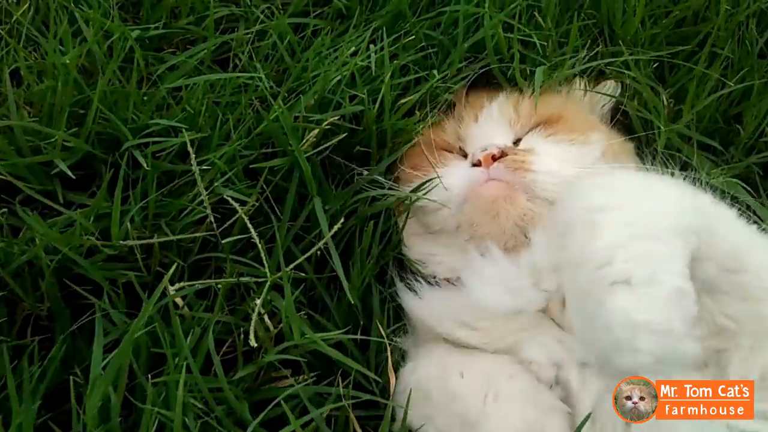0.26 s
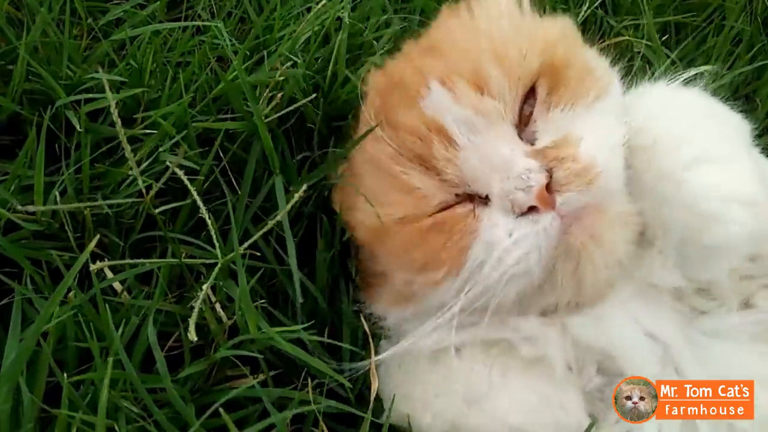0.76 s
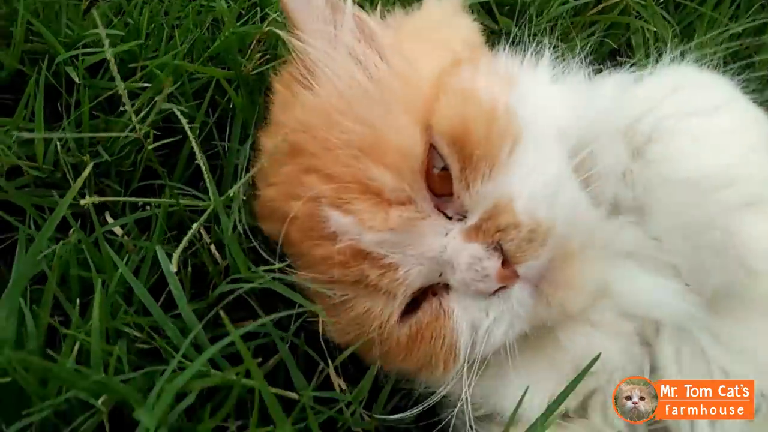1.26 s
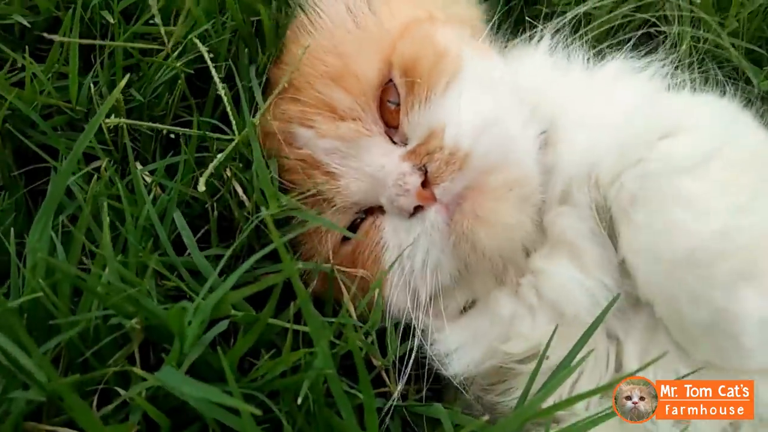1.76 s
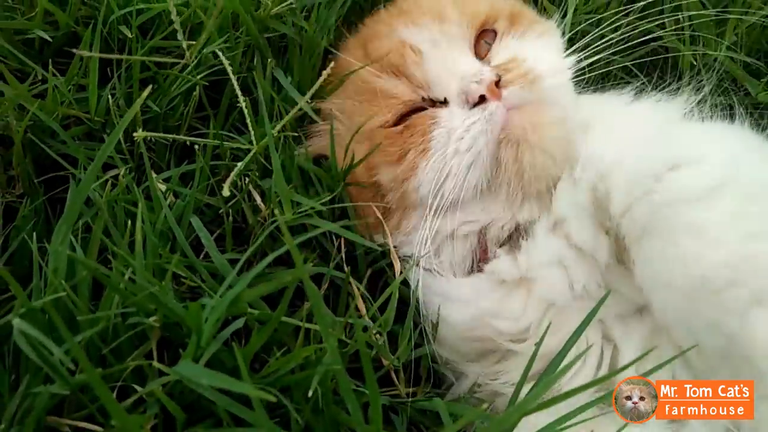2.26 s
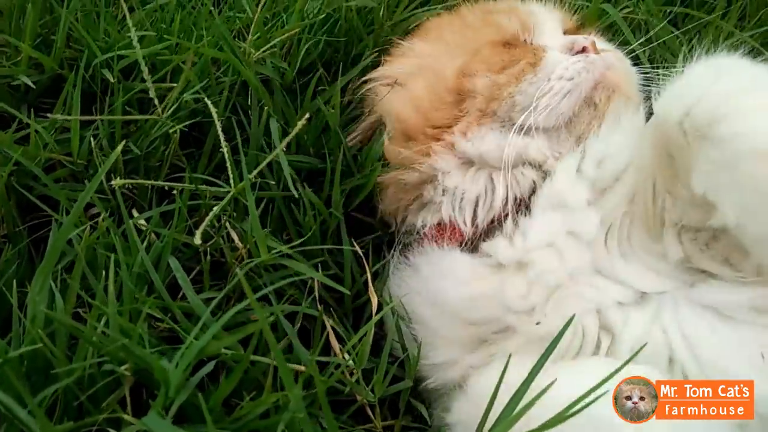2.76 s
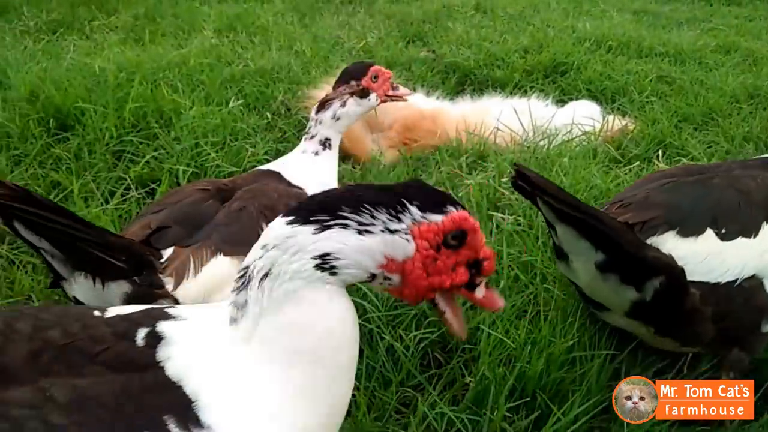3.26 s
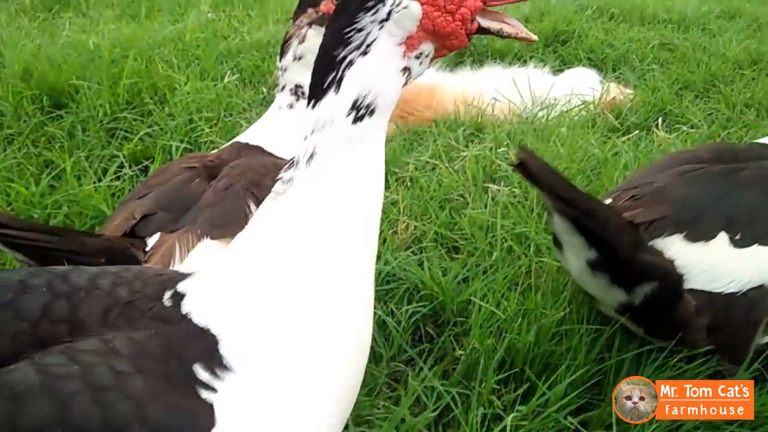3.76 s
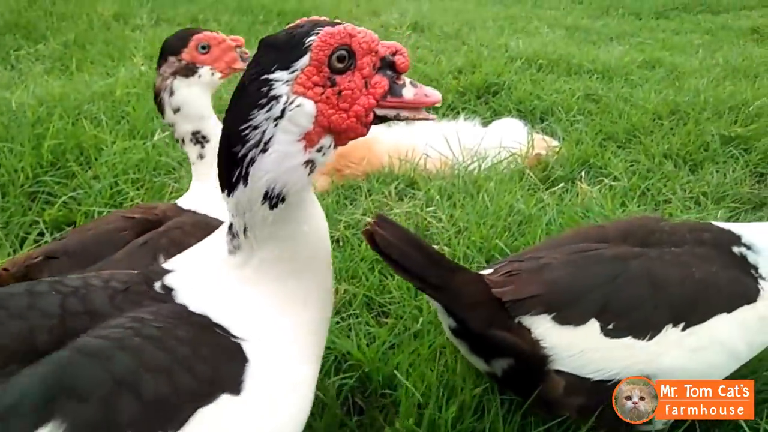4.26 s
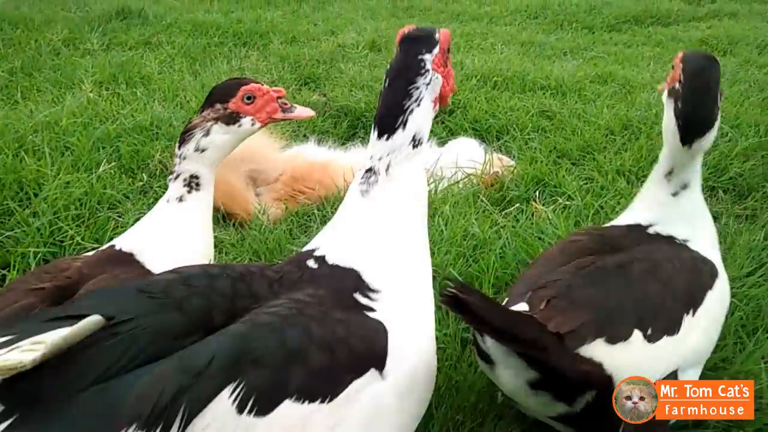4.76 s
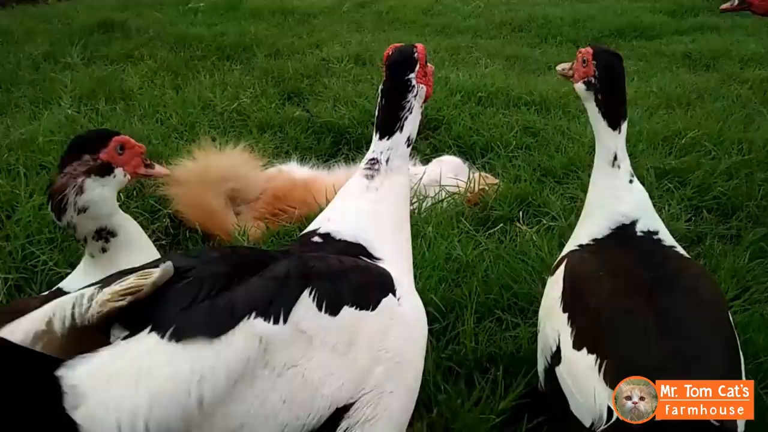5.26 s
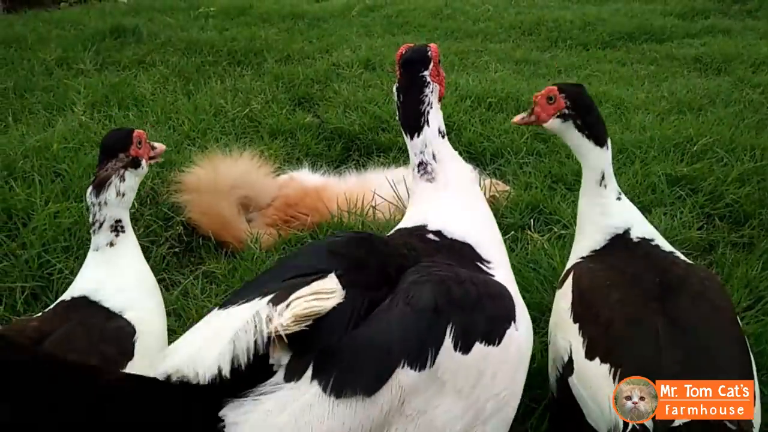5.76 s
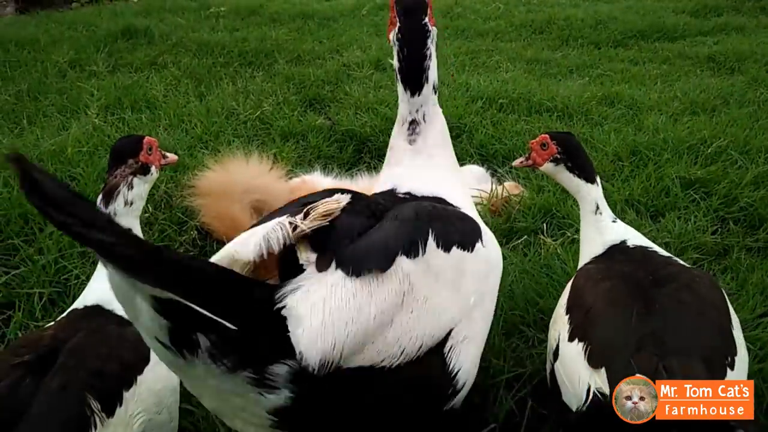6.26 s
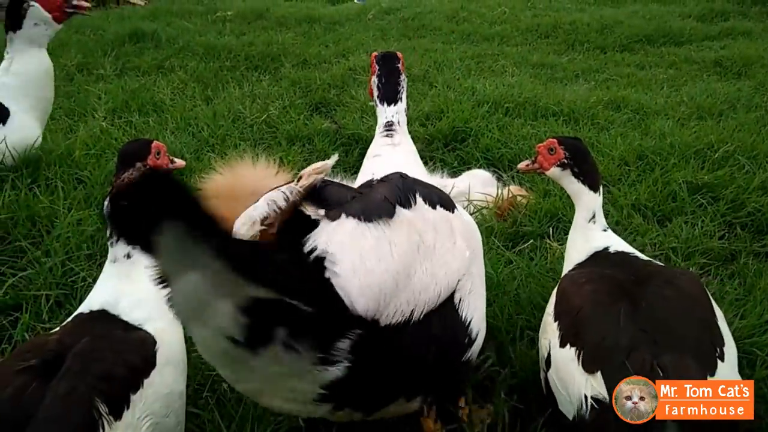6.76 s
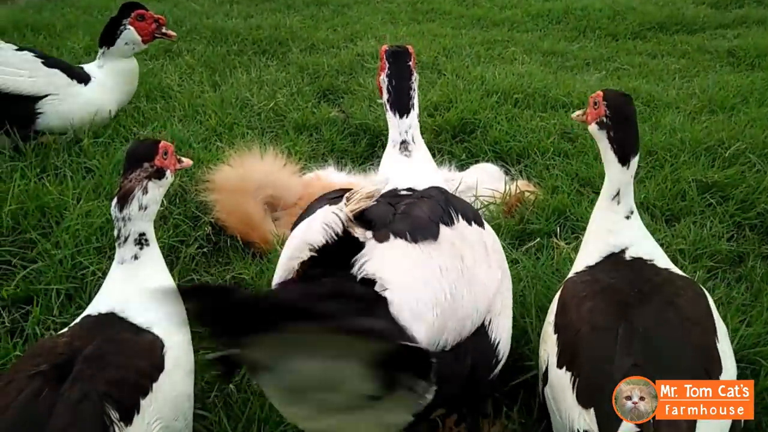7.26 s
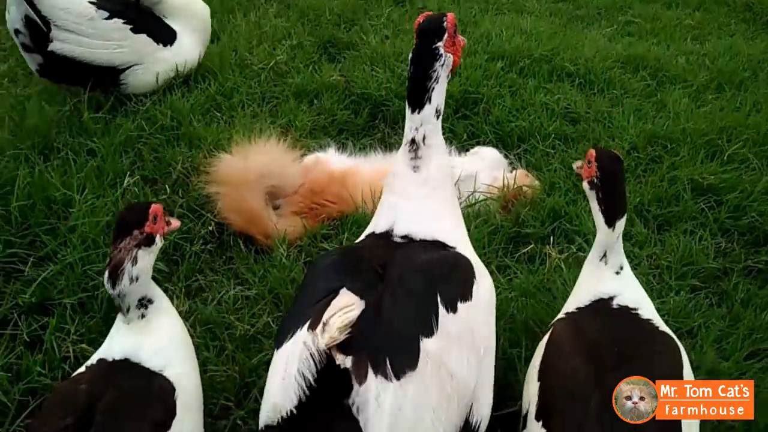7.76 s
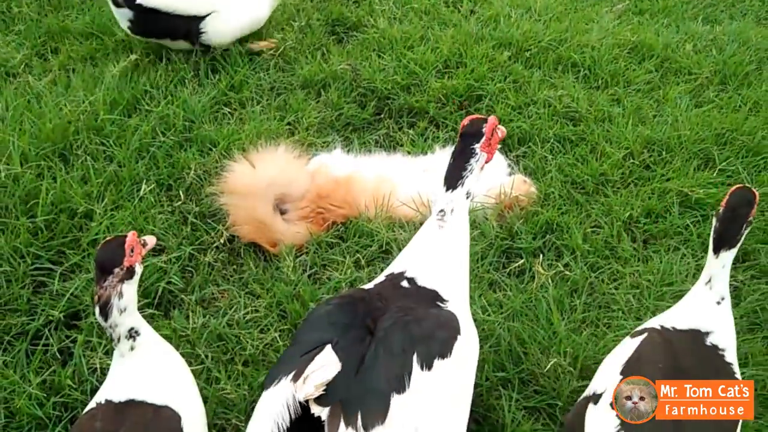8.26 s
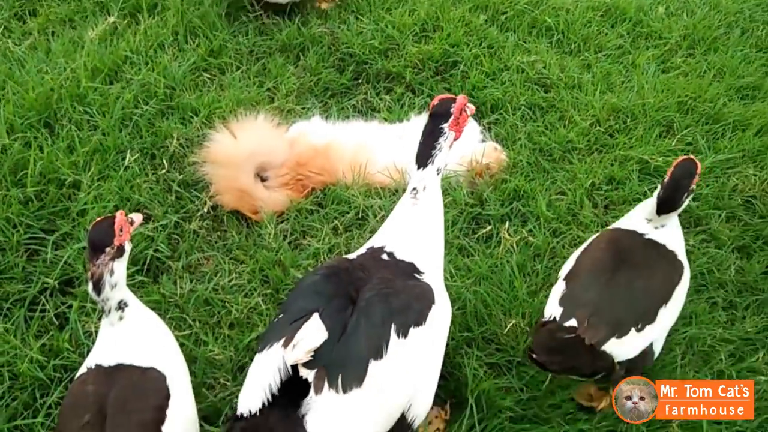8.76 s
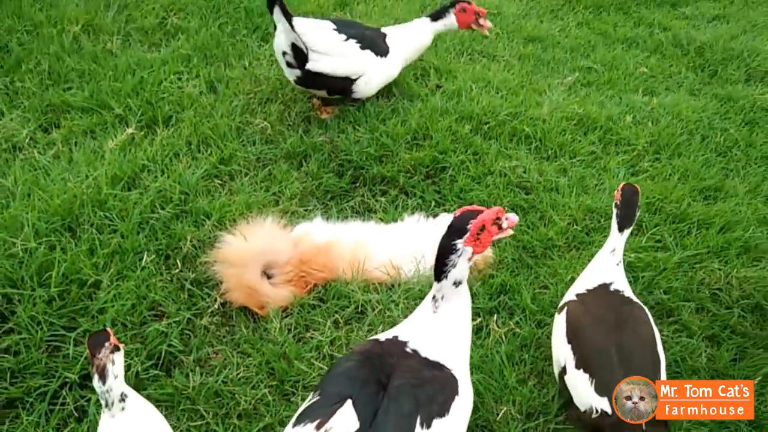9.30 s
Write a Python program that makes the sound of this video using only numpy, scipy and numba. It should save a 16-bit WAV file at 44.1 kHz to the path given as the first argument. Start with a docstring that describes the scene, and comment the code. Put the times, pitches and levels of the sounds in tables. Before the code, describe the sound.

A group of ducks calls softly on a lawn, with light wind rumbling on the microphone. In the first second and a half there are faint breathy huffs, dull scuffs in the grass and a quick cluster of high ticks at about 0.5 seconds. A distant cow grunts hoarsely from 1.3 seconds, then holds one steady low until 2.8. Right after, the ducks break into clear pips and wavering, half-whistled trills. From about 3 seconds they pant short, hoarse huffs, roughly three a second, over a high hiss that swells and sinks. The huffing is strongest from 4 to 7 seconds, with trills, pips and an occasional thin note woven through. Dull bumps hit the microphone near 0.8, 3.6 and 6.2 seconds. The calls dip around 7 seconds, pick up again near 8.4, then thin out with a faint grass rustle before ending at 9.5.

```python
"""Ducks crowding on a lawn

Drakes pant hoarse huffs, breath rushing through windpipe and beak, while a high hiss floor swells and
sinks with the panting. Hens trill a wavering half-whistle, hold thin notes and pip. Early on a far cow
grunts and lows. Grass scuffs and rustles, a few high ticks sound, and wind bumps the microphone."""
import sys
import numpy as np
from scipy import signal
from scipy.fft import rfft, irfft, next_fast_len
from scipy.io import wavfile
from scipy.ndimage import uniform_filter1d
from numba import njit

SR = 44100
rng = np.random.default_rng(int(sys.argv[2]) if len(sys.argv) > 2 else 0)


def transcribe(u):
    """Save the signal u as a 16-bit wav file named by the first command-line argument.

    u: samples, shape (n,) or (channels, n), limited to [-1, 1]; the rate is SR.
    q: integer samples, one column per channel.
    """
    v = np.clip(np.atleast_2d(u).T, -1, 1)
    q = np.round(v * 32767).astype(np.int16)
    wavfile.write(sys.argv[1], SR, q)


N = 420273
CUTOFF_HZ = 14340

# The drakes' huffs: middle_s, length_s, pipe_hz, pipe_db, hiss_db, top_lift_db, lift_near_6khz_db,
# sharp_hz (hiss resonance), then centre_hz, level_db for each of three beak cavities
DRAKE_HUFFS = [(0.009, 0.022, 1450, -61.5, -65, -8, 6.5, 7930, 2830, -66, 3500, -62, 4700, -72),
               (0.844, 0.076, 1440, -58.5, -60.5, -9, 5, 7800, 2730, -69.5, 3730, -71, 4240, -69.5),
               (1.482, 0.072, 1306, -64, -63.5, -6, 13.5, 10900, 2730, -72, 3600, -70.5, 4340, -66.5),
               (1.969, 0.091, 1470, -59, -63.5, -3, 11.5, 10600, 3100, -71, 3840, -73, 4430, -70.5),
               (2.598, 0.11, 1510, -59, -64, -1, 14.5, 10700, 2320, -66.5, 3760, -68.5, 4470, -67.5),
               (2.856, 0.03, 1340, -42, -59.5, -13, -6, 9300, 2900, -66.5, 4270, -73, 4500, -71),
               (2.896, 0.014, 1350, -45, -58, -12, -11, 9300, 3020, -67, 4070, -60, 4350, -63),
               (3.042, 0.072, 1240, -45.5, -87, -4, 15, 9400, 2480, -83, 4060, -77, 4840, -75),
               (3.103, 0.035, 1190, -47, -74.5, -18, 9, 9900, 3040, -64, 3480, -91, 4420, -64.5),
               (3.303, 0.037, 1430, -53, -61.5, 0, -6, 10600, 2880, -62.5, 3530, -71, 4460, -75),
               (3.377, 0.068, 1400, -55.5, -56.5, -6, 10, 9640, 2860, -60, 3930, -65.5, 4390, -75),
               (3.476, 0.12, 1355, -56, -68.5, -4, 13, 8850, 2850, -72.5, 3870, -78, 4250, -85),
               (3.687, 0.1, 1270, -80, -53, 9.5, 4.5, 9060, 2430, -61.5, 3620, -68, 5060, -64),
               (3.845, 0.04, 1330, -68, -78, -6, 1, 9600, 2600, -88, 3500, -94, 4500, -92),
               (3.965, 0.11, 1280, -66.5, -48.5, -2, -5, 10000, 2500, -61.5, 3800, -63.5, 4590, -84),
               (4.18, 0.058, 1370, -43.5, -61, -4, 11, 9200, 2770, -49.5, 3870, -45.5, 4580, -58),
               (4.28, 0.077, 1080, -72, -44, -5, -7, 9200, 2440, -59, 3770, -59.5, 4740, -62),
               (4.576, 0.078, 1360, -43.5, -65, -6, 0, 11500, 2700, -57.5, 3940, -59.5, 4440, -61),
               (4.7, 0.13, 1360, -77, -63.5, -9, -18, 9400, 2510, -64, 3890, -69.5, 4700, -66.0),
               (5.04, 0.077, 1365, -48, -57.5, -1.5, 4.5, 9300, 2830, -56.5, 3880, -56, 4160, -60.5),
               (5.317, 0.065, 1294, -46, -57, 1.5, 2, 10000, 3100, -58.5, 3500, -66, 4300, -61.5),
               (5.504, 0.057, 1350, -47.5, -82, -16, -9, 9240, 2819, -62, 3160, -60.5, 4300, -91),
               (5.618, 0.08, 1290, -74, -55.5, -13, -10, 9080, 2760, -70, 3670, -70, 4500, -64.5),
               (5.881, 0.067, 1390, -45.5, -57.5, -14, -7, 9990, 3130, -54.5, 3770, -56, 4200, -59),
               (6.12, 0.055, 1410, -46.5, -67, -13, -11, 9450, 2880, -58, 3383, -59, 4400, -84),
               (6.377, 0.058, 1420, -45, -63.5, -12, -1, 9800, 2760, -58.5, 3218, -58.5, 4380, -91),
               (6.572, 0.049, 1420, -51.5, -61, -7, 0, 9300, 2800, -58.5, 3620, -58.5, 5440, -69),
               (6.693, 0.047, 1410, -55, -60.5, -10, -1, 8600, 3140, -88, 3850, -56, 4340, -62),
               (6.93, 0.07, 1420, -55.5, -68.5, -10.5, -8, 8700, 2800, -60.5, 3623, -69, 4270, -68),
               (7.232, 0.067, 1180, -61.5, -79, 2, 14, 8750, 2810, -94, 3720, -65, 4240, -72),
               (7.319, 0.09, 1425, -49.5, -82, -5, 1, 8860, 2730, -58.5, 3290, -59.5, 3970, -65),
               (7.601, 0.15, 1216, -57.5, -86, -7, 2.5, 8600, 2686, -81.5, 3290, -85, 4560, -99),
               (7.94, 0.058, 1390, -49, -62.5, -8.5, 6, 8940, 2640, -58, 3410, -60, 4700, -71),
               (8.276, 0.057, 1390, -61, -77, -3, -6, 9350, 3040, -61, 3450, -51.5, 4300, -61),
               (8.409, 0.081, 1470, -75, -81, -4, 8, 9000, 2710, -71, 3470, -71, 4340, -82),
               (8.488, 0.057, 1330, -47, -64, 1, 6, 9850, 2690, -54, 3490, -48.5, 4380, -53),
               (8.696, 0.05, 1370, -51, -70, -1, 12.5, 10800, 2730, -54.5, 3360, -55.5, 4440, -70),
               (9.138, 0.35, 1560, -85, -67, -2.5, 13.5, 9400, 2560, -81, 3230, -81, 4536, -87),
               (9.434, 0.056, 1405, -52, -70, -9, 0, 9200, 2840, -55, 3620, -59, 4900, -74)]


def amp(db):
    """Gain of a level in dB."""
    return 10 ** (np.asarray(db) / 20)


def rms_one(x):
    """Scale to rms 1."""
    return x / np.sqrt(np.mean(x ** 2) + 1e-20)


def in_time(rows, fade_s=0.0091):
    """A curve for each column after the time, then a gate that fades shut outside the rows."""
    s, *columns = np.transpose(rows)
    t = np.arange(N) / SR
    gate = np.clip(np.minimum(t - s[0], s[-1] - t) / fade_s + 1, 0, 1)
    return [np.interp(t, s, column) for column in columns] + [gate]


def glide(start_s, end_s, first_hz, last_hz):
    """A frequency curve that slides through each event and on to the next."""
    return np.interp(np.arange(N) / SR, np.ravel([start_s, end_s], "F"), np.ravel([first_hz, last_hz], "F"))


def swells(start_s, hold_s, level_db, rise_db_per_s, fall_db_per_s):
    """Envelope of events that rise, hold and fall away; the loudest one rules."""
    t, out = np.arange(0, N, 32) / SR, -200
    for s, held, db in np.broadcast(start_s, hold_s, level_db):
        attack_db = rise_db_per_s * np.maximum(s - t, 0)
        release_db = fall_db_per_s * np.maximum(t - s - held, 0)
        out = np.maximum(out, db - attack_db - release_db)
    return amp(np.interp(np.arange(N) / SR, t, uniform_filter1d(out, size=9)))


def drift(rate_hz):
    """Smooth random modulation with rms 1."""
    r = np.exp(-40 * np.pi * rate_hz / SR)
    slow = signal.lfilter([1], [1, -2 * r, r * r], rng.standard_normal(N // 20 + 2002))[2000:]
    return np.interp(np.arange(N) / 20, np.arange(len(slow)), rms_one(slow))


@njit
def resonate(x, hz, width_hz, sr):
    """A resonance whose centre may move."""
    out, r = np.zeros(len(x)), np.exp(-np.pi * width_hz / sr)
    for i in range(2, len(x)):
        drive = (1 - r * r) / 2 * (x[i] - x[i - 2])
        out[i] = drive + 2 * r * np.cos(2 * np.pi * hz[i] / sr) * out[i - 1] - r * r * out[i - 2]
    return out


def hollow(x, hz, width_hz):
    """The same resonance twice, for steep flanks."""
    hz = hz + np.zeros(len(x))
    return resonate(resonate(x, hz, width_hz, SR), hz, width_hz, SR)


def noise_band(hz, width_hz, samples=N):
    """Noise through one resonance; rms 1."""
    return rms_one(hollow(rng.standard_normal(samples), hz, float(width_hz)))


def cavities(modes):
    """Turbulent air through parallel resonances (centre_hz, width_hz, level_db); rms 1."""
    air = rng.standard_normal(N)
    return rms_one(sum((-1) ** k * amp(db) * rms_one(hollow(air, hz, width))
                       for k, (hz, width, db) in enumerate(modes)))


def coloured(spectrum):
    """Noise shaped by an EQ curve (frequency_hz, level_db); rms 1."""
    size = next_fast_len(N)
    hz = np.fft.rfftfreq(size, 1 / SR)[1:]
    point_hz, point_db = np.transpose(spectrum)
    gain = amp(np.interp(np.log(hz), np.log(point_hz), point_db, left=-80, right=-80))
    return rms_one(irfft(rfft(rng.standard_normal(size)) * np.append(0, gain), size)[:N])


def tones(hz, partials):
    """Sines at multiples of a pitch (multiple, rms_db)."""
    phase = 2 * np.pi * np.cumsum(hz) / SR
    return sum(amp(db) * np.sqrt(2) * np.sin(k * phase + rng.uniform(0, 2 * np.pi)) for k, db in partials)


def still_air():
    """A faint, steady bed of outdoor air."""
    # Colour of the air: frequency_hz, relative_db
    spectrum = [(120, -35), (200, -20.5), (369, -5), (957, 1.5), (1150, -3.5), (1530, -4.5), (2350, -8),
                (4990, -18.5), (6000, -20.5), (7800, -28), (13200, -120)]
    return amp(-78) * coloured(spectrum)


def wind():
    """Wind rumbles on the microphone, with gusts riding on a low breeze."""
    # Strength of the breeze: time_s, level_db
    breeze = [(0, -79), (1.2, -78.5), (1.6, -72), (2.4, -79), (3.0, -72), (3.6, -78), (5.5, -78),
              (6.6, -81), (8.4, -82), (9.53, -86)]
    # Gusts: peak_s, level_db
    gusts = [(.32, -79), (.9, -74), (1.11, -73.5), (2.65, -81), (2.81, -65), (3.29, -62.5), (3.66, -61.5),
             (3.9, -69), (4.17, -63.5), (4.51, -63), (4.99, -70), (5.33, -67.5), (5.57, -65), (5.89, -64),
             (6.18, -58), (6.48, -75)]
    # Colour of the rumble: frequency_hz, relative_db
    spectrum = [(22, -22), (38, -4), (54, 8), (67, 2.5), (113, -2.5), (150, 3), (227, -13), (300, -5),
                (390, -42), (660, -120)]
    s, db = np.transpose(gusts)
    gusting = swells(s, 0, db, rise_db_per_s=400, fall_db_per_s=195)
    return np.hypot(amp(in_time(breeze)[0]), gusting) * amp(2.36 * drift(8.2)) * coloured(spectrum)


def microphone_bumps():
    """Padded knocks on the microphone ring low, sag in pitch and are faded out within 1/8 s."""
    # Knocks: start_s, level_db, settled_pitch_hz, t60_s (before the fade)
    knocks = [(0.804, -51.5, 60, 0.91), (3.642, -43, 66.5, 0.075), (6.172, -46, 75, 0.095)]
    out, t = np.zeros(N), np.arange(SR // 8) / SR
    attack = 1 - np.exp(-t / 0.001)
    fade = np.hanning(2 * len(t))[len(t):]
    for s, db, hz, t60 in knocks:
        cycles = hz * (t + 0.0041 * (1 - np.exp(-t / 0.0032)))
        out[round(s * SR):][:len(t)] -= attack * np.sin(2 * np.pi * cycles) * amp(db - 60 * t / t60) * fade
    return out


def ticks():
    """Sharp ticks ring for an instant near 9 kHz."""
    # Ticks: start_s, peak_db
    hits = [(0.5358, -57), (0.542, -50.5), (0.5465, -53), (0.549, -46), (0.551, -33.5), (0.554, -39.5),
            (1.384, -60), (2.305, -60)]
    clicks = np.zeros(N)
    for s, db in hits:
        clicks[round(s * SR)] = amp(db + 40.5)   # make-up gain for the filters
    return hollow(hollow(clicks + 1e-18, 9220.0, 650.0), 7800.0, 2800.0)


def scuffs():
    """Short dull brushes in the grass, each with a pitch of its own."""
    # Brushes: start_s, centre_hz, level_db
    brushes = [(.31, 890, -87), (.45, 970, -74), (.545, 1000, -78), (.61, 1410, -75), (.77, 840, -71),
               (.99, 1350, -77), (1.057, 1390, -80), (1.21, 900, -76), (1.27, 890, -73), (1.315, 830, -68),
               (1.36, 320, -71.5)]
    s, hz, db = np.transpose(brushes)
    hold_s = 0.016
    gain = swells(s, hold_s, db, rise_db_per_s=1100, fall_db_per_s=1100)
    return gain * noise_band(glide(s, s + hold_s, hz, hz), width_hz=250)


def rustles():
    """Feathers or grass rustle: broad, flickering noise in the mids and highs."""
    # Rustles: start_s, length_s, level_db
    strokes = [(8.548, 0.039, -82), (8.736, .08, -70.5), (9.0, 0.27, -71)]
    gain = swells(*np.transpose(strokes), rise_db_per_s=900, fall_db_per_s=700)
    return gain * amp(2.54 * drift(30)) * noise_band(2300, width_hz=4000)


def cow_low():
    """A far cow holds one pitch while its chest, nose and mouth tones swell separately."""
    # The low: time_s, pitch_hz, chest_db, mouth_db, lower_cavity_hz, upper_cavity_hz, roughness (0-1)
    moo = [(1.74, 132.3, -64, -68, 1600, 2000, 0.28), (1.79, 133.1, -50.5, -70, 1600, 2050, 0.26),
           (1.84, 133.4, -48, -68, 1620, 2090, 0.17), (1.95, 134.5, -46.5, -63, 1500, 2000, 0.15),
           (2.05, 135.3, -51.5, -60.5, 1620, 2110, 0.32), (2.1, 136.2, -65, -60.5, 1680, 2140, 0.16),
           (2.14, 136.6, -51, -63, 1740, 2130, 0.12), (2.19, 136.8, -65, -58, 1780, 2100, 0.15),
           (2.3, 136.7, -66, -58.5, 1800, 2130, 0.073), (2.42, 136.7, -69.5, -60.5, 1730, 2177, 0.082),
           (2.47, 136.6, -62, -61, 1720, 2086, .15), (2.51, 136.2, -55, -60.5, 1470, 2000, 0.18),
           (2.6, 134.5, -49.5, -66.5, 1500, 2030, 0.51), (2.7, 134, -66.5, -66, 1700, 2200, 0.94),
           (2.76, 131, -75, -76, 1705, 2210, 0.82)]
    # Nasal tones: time_s, level_db
    nasal = [(1.8, -72), (2.0, -78), (2.08, -72), (2.2, -73), (2.32, -80), (2.45, -82), (2.52, -64.5),
             (2.62, -69), (2.72, -70)]
    # Mouth tones: harmonic, relative_db
    mouth_partials = [(9, -2), (10, -6), (11, -1), (12, -9), (13, -2.5), (14, -8.5), (15, -4), (16, -7),
                      (17, -4), (18, -2.5), (19, -8), (20, -7)]
    hz, chest_db, mouth_db, lower_hz, upper_hz, rough, gate = in_time(moo, fade_s=0.016)
    hz = hz * (1 + 0.001 * drift(13) + .03 * rough * drift(150))
    chest = amp(2.5 * drift(14)) * tones(hz, [(3, -6.5)])
    nose = amp(in_time(nasal)[0] + 2 * drift(8)) * tones(hz, [(6, 0), (7, -6)])
    # every mouth tone wavers by itself on the long way over the fields
    voice = sum(amp(2.5 * drift(6)) * tones(hz, [partial]) for partial in mouth_partials)
    mouth = amp(-22) * voice + hollow(voice, lower_hz, width_hz=310) - hollow(voice, upper_hz, width_hz=310)
    return gate * (amp(chest_db) * chest + amp(mouth_db) * mouth + nose)


def cow_slide():
    """A second, falling tone under the lowing."""
    # The fall: time_s, pitch_hz (played 2% flat), level_db
    fall = [(1.95, 477.7, -66), (1.99, 455.7, -54.5), (2.08, 435, -58), (2.1, 423, -72), (2.17, 370, -76),
            (2.2, 340, -63), (2.23, 330, -81)]
    hz, level_db, gate = in_time(fall, fade_s=0.014)
    return gate * amp(level_db + 2.5 * drift(25)) * tones(hz * (1 + .015 * drift(30)), [(0.98, 0)])


def cow_grunt():
    """Air rasps in the cow's mouth over a hoarse grunt before the low turns clear."""
    # Rasp: time_s, relative_db
    rasp_curve = [(1.22, -79), (1.27, -69), (1.61, -62), (1.686, -63.5), (1.858, -78), (1.95, -68)]
    # Mouth cavities: centre_hz, width_hz, relative_db
    mouth_modes = [(2050, 150, -3), (2485, 140, -9.5), (1694, 140, -5.5)]
    # Grunt: time_s, resonance_hz, relative_db
    grunt_curve = [(1.25, 340, -81), (1.364, 308, -82), (1.43, 440, -54.5), (1.546, 316, -53),
                   (1.708, 408, -51.5), (1.9, 380, -66)]
    rasp_db, rasp_gate = in_time(rasp_curve, fade_s=0.033)
    rasp = rasp_gate * amp(rasp_db - 3.5) * cavities(mouth_modes)
    hz, grunt_db, grunt_gate = in_time(grunt_curve, fade_s=0.27)
    grunt = noise_band(hz, width_hz=140) + amp(6) * cavities([(288, 74, -12), (570, 340, -11.5)])
    return rasp + grunt_gate * amp(grunt_db - 13.5) * grunt


def lulls_db():
    """V-shaped dips in which the treble floor and the flock's murmur sink together."""
    # Lulls: middle_s, half_length_s, depth_db
    lulls = [(0.474, 0.069, 14), (1.03, 0.02, 11), (1.151, 0.024, 11), (1.375, 0.082, 12),
             (3.176, 0.063, 14), (3.786, 0.016, 5), (4.436, 0.049, 9.5), (4.83, 0.069, 10),
             (5.178, 0.071, 3.5), (5.718, 0.047, 3.5), (5.965, 0.065, 12), (6.29, 0.12, 15),
             (7.165, 0.15, 22.5), (8.072, 0.068, 10), (8.91, 0.1, 2), (9.364, 0.08, 18)]
    t = np.arange(N) / SR
    return -sum(db * np.clip(1 - np.abs(t - s) / half, 0, 1) for s, half, db in lulls)


def shifting_hiss(low_db, top_db):
    """Two channels of hiss whose bands swell separately, with lifts near 6 kHz and at the top."""
    # Colour of the hiss: frequency_hz, relative_db
    spectrum = [(3060, -99), (5200, -14.5), (6200, -6.5), (7570, -4.5), (8960, 1), (10000, -0.5),
                (11600, -3), (13400, 1), (14300, 1)]
    # Band edges: crossover_hz
    crossovers = [5200, 7000, 8500, 10000, 11500, 13000]
    hiss = np.array([coloured(spectrum), coloured(spectrum)])
    lows = [signal.sosfiltfilt(signal.butter(3, hz, fs=SR, output="sos"), hiss) for hz in crossovers]
    bands = np.diff([0 * lows[0], *lows, hiss], axis=0)
    lifts_db = [0, low_db, 0, 0, top_db / 2, top_db, top_db]
    return sum(amp(db + 4.5 * drift(8)) * band for db, band in zip(lifts_db, bands))


def treble_hiss():
    """A high hiss floor swells and sinks, sharper on each huff and a little different left and right."""
    # Hiss floor between the huffs: time_s, level_db
    floor = [(0, -90.5), (.5, -73.5), (.57, -67.5), (1.33, -68.5), (1.66, -76.5), (1.71, -93), (2.1, -86),
             (2.3, -79.5), (2.45, -88.5), (3.22, -79), (3.3, -68.5), (3.8, -62.5), (4.1, -58.5),
             (4.34, -55), (4.5, -59), (4.75, -57.5), (4.88, -60.5), (5.0, -57.5), (5.2, -59), (5.38, -56),
             (5.5, -61), (5.75, -59), (5.9, -58.5), (6.0, -62.5), (6.15, -59), (6.6, -58.5), (7.05, -69),
             (7.4, -63.5), (7.9, -70.5), (8.35, -62), (8.65, -76), (9.05, -87), (9.25, -69.5),
             (9.53, -66.5)]
    # Resonances in the hiss: multiple (of sharp_hz), relative_db
    resonances = [(0.631, -29), (1.002, -2.5), (1.23, -8), (1.42, -13)]
    s, length, _, _, hiss_db, top_lift, low_lift, sharp_hz = np.transpose(DRAKE_HUFFS)[:8]
    top_db, low_db, _ = in_time(np.transpose([s, top_lift, low_lift]))
    rising_hz = glide(s - length / 3, s + length / 3, 0.955 * sharp_hz, 1.045 * sharp_hz)
    hold_s = 0.58 * length
    surge = swells(s - hold_s / 2, hold_s, hiss_db, rise_db_per_s=320, fall_db_per_s=820)
    gain = np.hypot(surge, amp(in_time(floor)[0] + lulls_db()))
    huff_share = surge / gain
    # between huffs the hiss loses its lower and upper edge, and its resonances
    hiss = shifting_hiss(low_db - 2.5 * (1 - huff_share), top_db - 1.5 * (1 - huff_share))
    for multiple, db in resonances:
        hz = np.minimum(multiple * rising_hz * (1 + .03 * drift(9)), CUTOFF_HZ)
        lift = huff_share * amp(db + max(multiple - 1, 0) * 2 * top_db + 4 * drift(15))
        hiss = hiss + lift * np.array([noise_band(hz, width_hz=900) for _ in hiss])
    mid, side = gain * amp(1.2 * drift(23) + 0.54 * drift(200)) * hiss
    dull_skirt = gain * amp(-14.5) * noise_band(3440, width_hz=2600)
    return dull_skirt + mid + amp(-7) * side * np.array([[1], [-1]])


def hen_trills():
    """A throbbing tone and breath share one wavering resonance: half whistle, half air."""
    # Trills: start_s, length_s, first_hz, last_hz, level_db
    trills = [(2.835, 0.075, 883, 985, -45), (3.25, 0.083, 990, 1075, -53), (3.59, .13, 1025, 945, -49),
              (3.735, .025, 1450, 1399, -56.5), (3.895, 0.115, 1030, 952, -48.5),
              (4.17, 0.057, 957, 1020, -53), (4.24, 0.056, 1034, 994, -44), (4.56, 0.21, 852, 890, -47),
              (4.86, 0.079, 977, 880, -54), (4.94, 0.12, 856, 900, -47), (5.21, 0.15, 910, 1010, -44.5),
              (5.41, 0.13, 850, 865, -46), (5.54, 0.11, 950, 854, -44.5), (5.83, 0.071, 877, 930, -47.5),
              (6.08, 0.12, 1090, 960, -53), (6.31, 0.11, 960, 1010, -46.5), (6.65, 0.069, 960, 1048, -49),
              (6.9, 0.06, 920, 846, -55), (7.19, 0.12, 830, 814, -62.5), (7.5, 0.38, 1120, 1000, -67.5),
              (7.895, .07, 1050, 1010, -57), (8.04, 0.049, 1010, 1020, -64), (8.135, 0.31, 854, 913, -51.5),
              (8.44, 0.057, 990, 977, -46.5), (8.75, 0.15, 1043, 964, -63), (8.97, 0.043, 800, 780, -67),
              (9.135, 0.013, 910, 940, -65), (9.385, 0.026, 1080, 900, -63)]
    pulses_per_s, tone_share = 85, .52
    s, length, first_hz, last_hz, db = np.transpose(trills)
    gain = swells(s, length, db, rise_db_per_s=370, fall_db_per_s=780)
    hz = glide(s, s + length, first_hz, last_hz) * (1 + .04 * drift(28))
    pulses = np.cumsum(pulses_per_s * amp(2.5 * drift(20))) / SR
    throb = np.sin(np.pi * pulses) * amp(2.5 * drift(40))
    voiced = rms_one(throb * tones(hz, [(0.99, 0)]))   # just under the resonance
    breath = noise_band(hz, width_hz=220)
    return gain * (np.sqrt(tone_share) * voiced + np.sqrt(1 - tone_share) * breath)


def hen_held_notes():
    """Thin held notes: breath through a narrow resonance."""
    # One list per note: time_s, pitch_hz, level_db
    notes = [
        [(2.64, 906, -64), (2.7, 870, -69), (2.77, 857, -63)],
        [(3.815, 1390, -56.5), (3.85, 1370, -63), (3.89, 1360, -61)],
        [(8.385, 2714, -69), (8.42, 2722, -61), (8.45, 2680, -62)],
        [(8.52, 1388, -57), (8.6, 1340, -67), (8.65, 1335, -62)],
        [(9.2, 1340, -67), (9.26, 1344, -57), (9.33, 1320, -62), (9.38, 1333, -61)],
    ]
    out = np.zeros(N)
    for note in notes:
        hz, level_db, gate = in_time(note, fade_s=0.026)
        out += gate * amp(level_db) * noise_band(hz, width_hz=58)
    return out


def hen_pips():
    """Clear pips and warbles, duller and breathier when soft."""
    # One list per pip: time_s, pitch_hz, level_db
    pips = [
        [(2.7805, 1055, -38), (2.787, 1050, -34.5), (2.797, 1025, -43), (2.805, 963, -44), (2.819, 936, -49),
         (2.835, 940, -71)],
        [(2.895, 1050, -75), (2.91, 1030, -52), (2.922, 990, -51), (2.938, 705, -58), (2.95, 714, -55),
         (2.962, 912, -55), (2.972, 997, -48.5), (2.995, 1010, -66)],
        [(3.046, 1100, -75), (3.06, 1050, -47), (3.068, 1094, -46), (3.092, 1098, -38.5), (3.1, 1049, -45),
         (3.116, 977, -51), (3.14, 909, -73)],
        [(5.055, 900, -71), (5.07, 925, -45), (5.094, 1030, -51.5), (5.112, 960, -49), (5.128, 960, -53),
         (5.144, 1055, -54), (5.162, 845, -53), (5.19, 950, -54), (5.215, 900, -75)],
        [(5.37, 790, -59), (5.385, 800, -57), (5.43, 880, -63), (5.45, 900, -77)],
        [(6.21, 840, -77), (6.24, 870, -61), (6.262, 920, -60), (6.275, 945, -48.5), (6.284, 944, -59),
         (6.295, 960, -51), (6.315, 960, -75)],
        [(6.42, 1000, -72), (6.433, 1008, -47), (6.446, 950, -73), (6.46, 1010, -46.5), (6.476, 900, -66),
         (6.512, 898, -60), (6.535, 935, -50.5), (6.56, 960, -81)],
        [(7.0, 500, -93), (7.012, 560, -75), (7.03, 720, -67.5), (7.045, 640, -87)],
        [(8.53, 850, -78), (8.546, 820, -58.5), (8.562, 625, -61), (8.582, 744, -56), (8.596, 740, -60),
         (8.622, 511, -63), (8.638, 450, -86)],
    ]
    # The voice at full effort: harmonic, relative_db
    partials = [(1, 3.5), (2, -13.5), (3, -29.5), (4, -41)]
    full_effort_db = -35
    flutter_db = 1.5 * drift(70)
    out, air = np.zeros(N), rng.standard_normal(N)
    for contour in pips:
        hz, level_db, gate = in_time(contour, fade_s=0.00014)
        effort_db = level_db - full_effort_db
        pip = tones(hz, [(k, db + (k - 1) * effort_db) for k, db in partials])
        sounding = gate > 0
        breath_db = np.minimum(-16 - .6 * effort_db[sounding], -6)
        pip[sounding] += amp(breath_db) * rms_one(hollow(air[sounding], hz[sounding], width_hz=240))
        out += gate * amp(level_db + flutter_db) * pip
    return out


def drake_windpipe():
    """Breath rushes through the windpipe: a hoarse midrange swell on each huff, a murmur between."""
    # The flock's murmur: time_s, level_db
    murmur = [(0, -108), (.56, -80), (1.2, -99), (1.42, -57.5), (1.75, -64.5), (2.1, -85), (2.8, -72),
              (3.5, -60), (3.7, -61.5), (4.08, -86), (4.86, -62), (6.3, -62.5), (6.75, -70.5), (7.5, -66),
              (7.85, -59), (8.35, -71.5), (8.6, -63), (9.53, -66)]
    # Windpipe cavities that stay put: centre_hz, width_hz, relative_db
    pipe_modes = [(620, 250, -8), (1000, 300, -5), (1850, 300, -10)]
    s, length, hz, db = np.transpose(DRAKE_HUFFS)[:4]
    hold_s = 0.65 * length
    breath = swells(s - hold_s / 2, hold_s, db, rise_db_per_s=268, fall_db_per_s=464)
    gain = np.hypot(breath, amp(in_time(murmur)[0] + lulls_db()))
    pipe_hz = np.interp(np.arange(N) / SR, s, hz)
    pipe = amp(-6) * cavities(pipe_modes) + noise_band(pipe_hz, width_hz=290)
    return signal.sosfilt(signal.butter(5, [500, 2050], "band", fs=SR, output="sos"), gain * pipe)


def drake_beak():
    """Each huff swells, breaks off and leaves a faint tail; the cavities rise as the beak opens."""
    out, wander = np.zeros(N), drift(12)   # the beak is never still
    for huff in DRAKE_HUFFS:
        s, length = huff[:2]
        cavity_hz, cavity_db = huff[8::2], huff[9::2]
        at = np.arange(max(round((s - 2 * length) * SR), 0), min(round((s + 3 * length) * SR), N))
        along = (at / SR - s) / length
        slope_db = np.where(along < 0, 22, 42)   # it ends faster than it starts
        tail = (along > 0) * amp(-13.5 - 7.6 * along)   # the last air leaks out
        swell = np.maximum(amp(-slope_db * np.abs(along) ** 3), tail)
        bend = 1 + .02 * along + .015 * wander[at]
        for hz, db in zip(cavity_hz, cavity_db):
            air = rng.standard_normal(len(at))
            out[at] += amp(db) * swell * rms_one(hollow(air, hz * bend, width_hz=rng.uniform(260, 500)))
        back_of_mouth = noise_band(2400, width_hz=1100, samples=len(at))
        out[at] += amp(cavity_db[0] - 11) * swell * back_of_mouth
    return out


def scene():
    """Ducks and cow sit in the middle over wind and still air; only the hiss has stereo width."""
    rumble = wind()
    flutter = amp(1.52 * drift(25))   # the drakes' air flow flutters
    windpipe, hiss = drake_windpipe(), treble_hiss()
    drakes = flutter * (windpipe + drake_beak())
    hens = hen_trills() + hen_held_notes() + hen_pips()
    cow = cow_low() + cow_slide() + cow_grunt()
    background = rumble + microphone_bumps() + ticks() + scuffs() + rustles() + still_air()
    return background + cow + hiss + hens + drakes


def record(dry):
    """A steep low-pass cuts off the top."""
    return signal.sosfilt(signal.ellip(16, .5, 80, CUTOFF_HZ, fs=SR, output="sos"), dry)


dry = scene()
out = record(dry)
transcribe(out)
```